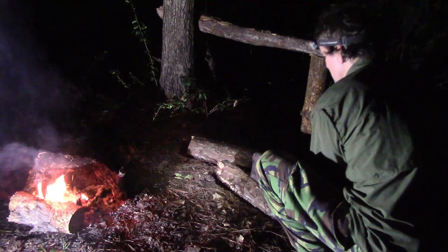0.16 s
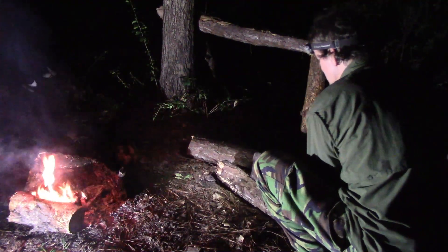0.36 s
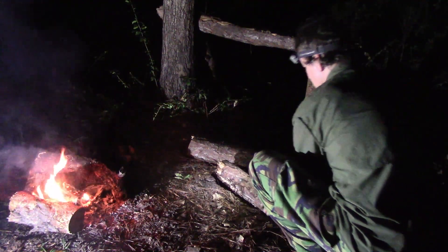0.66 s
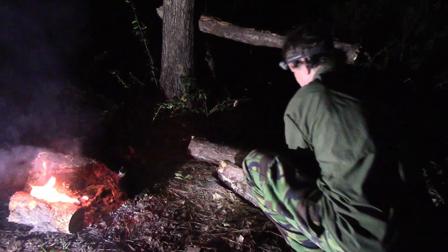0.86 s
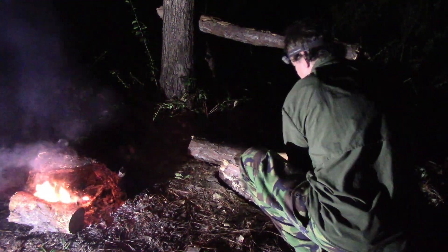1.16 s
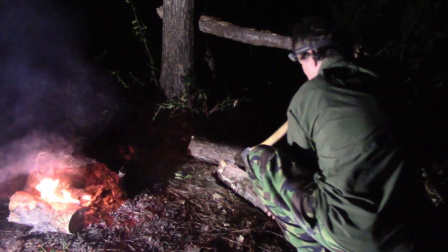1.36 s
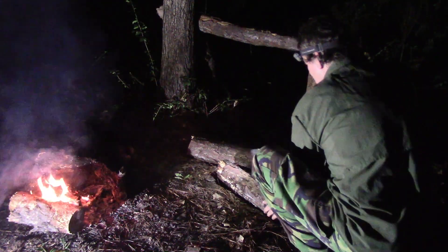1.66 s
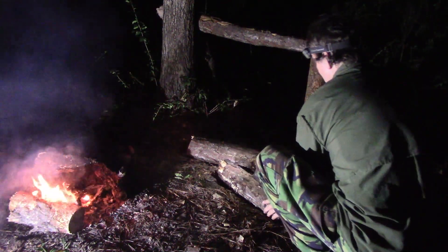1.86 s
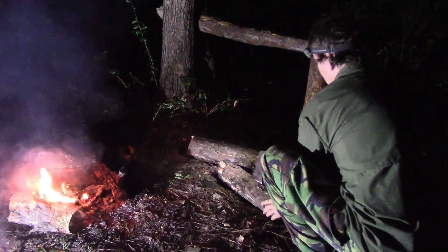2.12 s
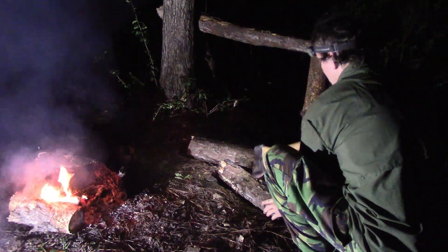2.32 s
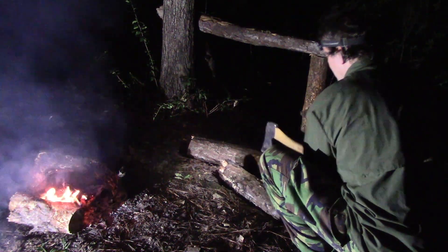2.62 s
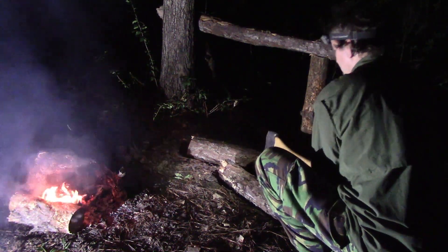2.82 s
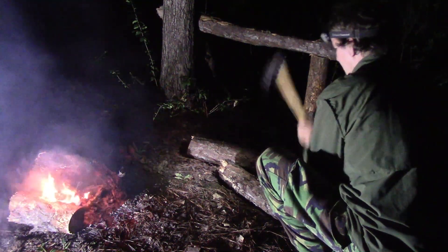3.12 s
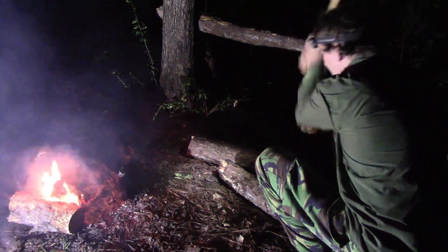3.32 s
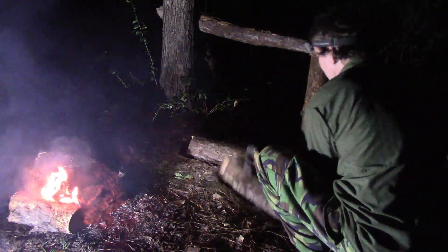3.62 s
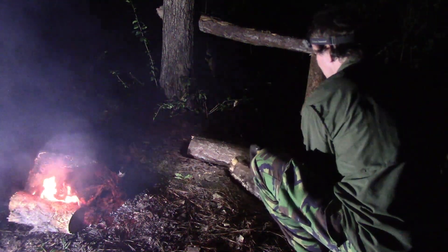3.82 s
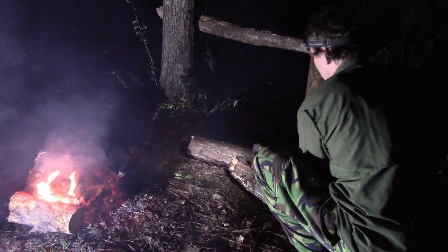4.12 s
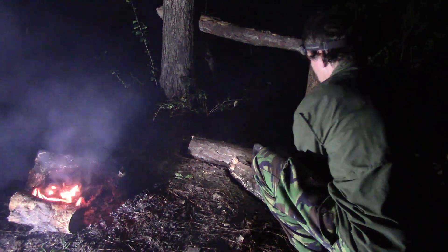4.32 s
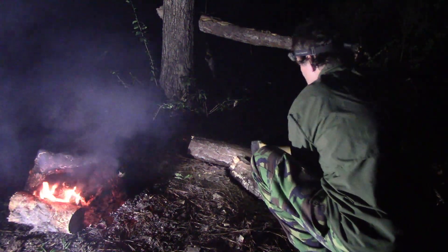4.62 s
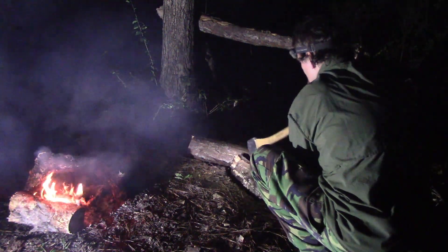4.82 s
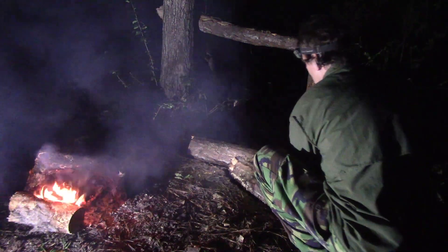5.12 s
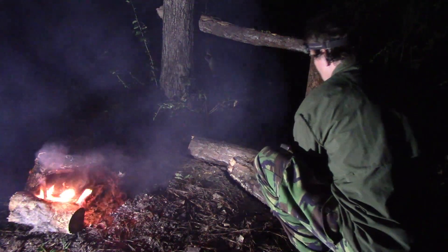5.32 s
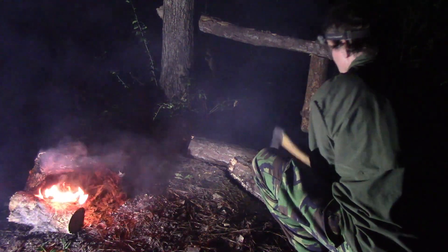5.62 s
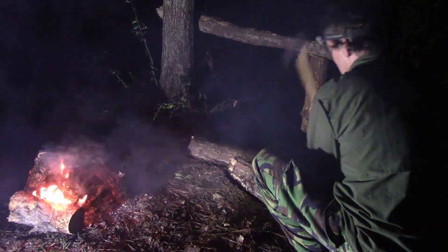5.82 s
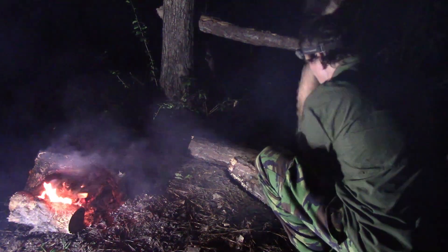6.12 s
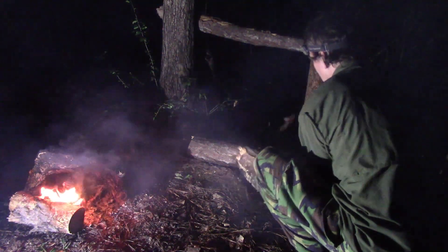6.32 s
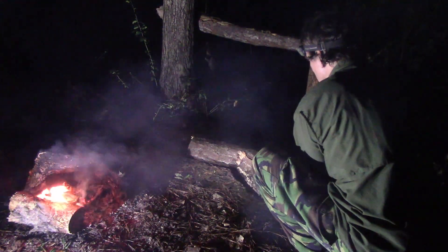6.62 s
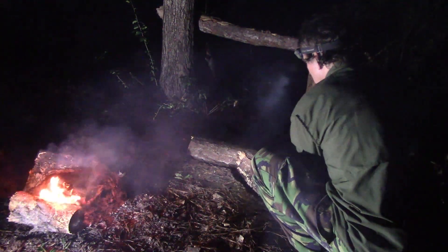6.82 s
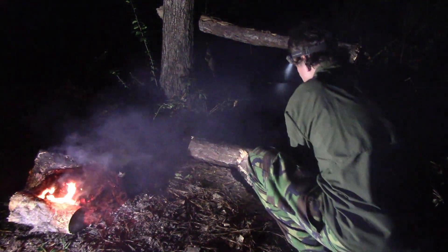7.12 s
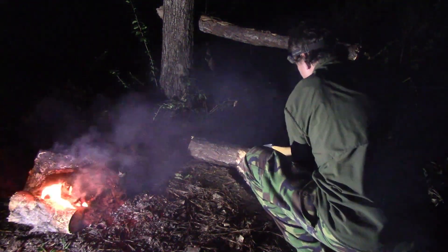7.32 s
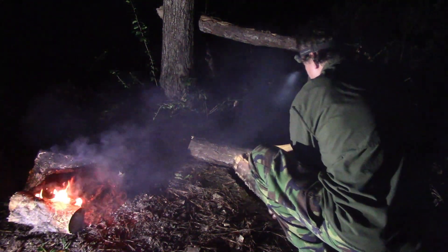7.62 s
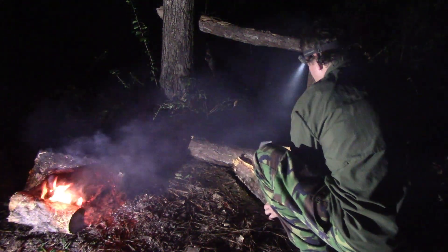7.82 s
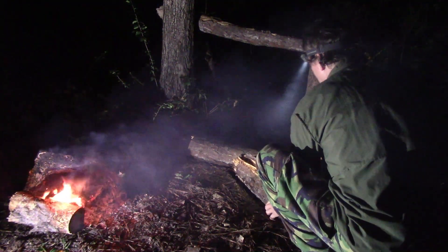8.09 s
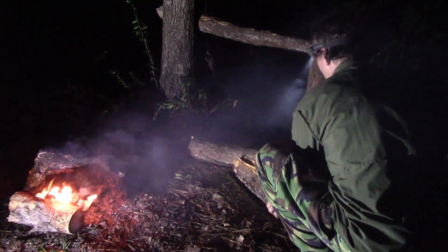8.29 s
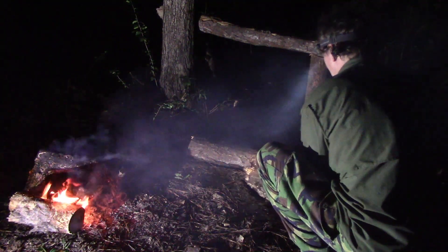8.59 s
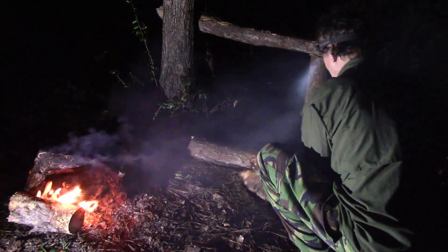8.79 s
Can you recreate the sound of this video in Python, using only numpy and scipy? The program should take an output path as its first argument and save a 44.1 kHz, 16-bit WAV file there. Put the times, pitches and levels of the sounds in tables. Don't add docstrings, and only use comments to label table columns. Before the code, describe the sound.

Quiet night woodland by a small fire, heard close. A faint tail of an earlier chop fades at 0 s under a steady, shimmering cricket trill, a very faint high cricket chirping in bursts, low flame flutter and airy hiss. Ember pops and knocks are busiest in the first two seconds, with a bright one at 0.44 s; soft leaf and cloth shuffles continue. At 3.6 s a hatchet cracks into a log, extremely loud, sharp and short, with a brief scatter from the trunks and a soil thud. Sparse pops follow, near 5 and 5.7 s. At 6.2 s a second blow lands, more hollow and woody. From 7.2 to 7.75 s fibres tear, snap and crunch densely, ending in tiny metallic tinks. A dull bump and rustle come at 8.25 s, then another cluster of snaps at 8.75 s, fading into insects and leaf rustle by 9 s.

```python
import sys
import numpy as np
from scipy import signal
from scipy.io import wavfile

SR = 44100
rng = np.random.default_rng(int(sys.argv[2]) if len(sys.argv) > 2 else 0)


def transcribe(signal):
    frames = np.atleast_2d(signal).T
    limited = np.clip(frames, -1, 1)
    pcm = np.round(limited * 32767).astype(np.int16)
    wavfile.write(sys.argv[1], SR, pcm)


def decibels_to_gain(level_db):
    exponent = np.asarray(level_db, float) / 20
    return 10 ** exponent


N = 394688
TIME = np.arange(N) / SR


def rms_one(x):
    return x / np.sqrt(np.mean(x ** 2) + 1e-20)


def peak_one(x):
    return x / np.max(np.abs(x))


def at_hz(points, hz):
    table = np.array(points)
    return np.interp(np.log(hz), np.log(table[:, 0]), table[:, 1])


def power_db(spectrum):
    return 10 * np.log10(np.sum(decibels_to_gain(2 * at_hz(spectrum, np.arange(20, 17000)))))


def add(out, s, sound):
    i = round(s * SR)
    out[max(i, 0):i + len(sound)] += sound[max(-i, 0):len(out) - i]


def drift(rate):
    r = np.exp(-80 * np.pi * rate / SR)
    steps = rng.standard_normal(N // 40 + 2002)
    slow = signal.lfilter([1], [1, -2 * r, r * r], steps)[2000:]
    return np.interp(np.arange(N) / 40, np.arange(len(slow)), rms_one(slow))


def band(x, low_hz, high_hz):
    edges = [low_hz, min(high_hz, .45 * SR)]
    return signal.sosfilt(signal.butter(2, edges, "band", fs=SR, output="sos"), x)


def steep_band(x, low_hz, high_hz):
    return band(band(x, low_hz, high_hz), low_hz, high_hz)


def ring(x, hz, t60):
    r, w = decibels_to_gain(-60 / (t60 * SR)), 2 * np.pi * hz / SR
    return signal.lfilter([0, np.sin(w)], [1, -2 * r * np.cos(w), r * r], x)


def burst(t60, rise=0., size=2048):
    age = np.arange(size) / SR - rise
    build_up = .5 * (1 + age / (rise + 1e-9))
    shape = np.where(age < 0, build_up, decibels_to_gain(-60 * age / t60))
    click = np.arange(size) == round(rise * SR)
    return rng.standard_normal(size) * shape + 2.47 * click


def parts(click, edges, dbs):
    return sum(decibels_to_gain(db) * peak_one(steep_band(click, *hz)) for hz, db in zip(edges, dbs))


# frequency in Hz, level in dB per Hz.
NIGHT_COLOUR = [(25, -6), (125, -6.5), (300, 1), (620, 2), (1050, -11), (3600, -22.5), (9500, -34.5),
                (16000, -49)]


def night_air(hz, flicker):
    level_db = -54 - power_db(NIGHT_COLOUR) + at_hz(NIGHT_COLOUR, hz)
    return decibels_to_gain(level_db + .6 * flicker + .9 * drift(10))


CHOIR_HZ = [2645, 2300, 3210, 2535, 2800]
# detuning spread in Hz, wing pulses per second, level in dB, number of singers.
CHOIRS = [(30.2, 50, -52.5, 7.3), (35.16, 41, -67, 5), (60, 59, -68, 5), (21.96, 64, -60.5, 4),
          (25.3, 72, -67.5, 3)]
# time in seconds, level in dB.
CHOIR_SWELL = [(0.0, -58.5), (0.3, -56.5), (0.65, -55), (1.39, -54), (1.49, -55.5), (1.94, -54.5),
               (2.17, -57), (2.99, -55.5), (3.21, -53.5), (3.61, -53.5), (4.16, -55), (5.33, -55.5),
               (6.5, -55), (6.98, -55.5), (7.5, -54.5), (7.7, -54.5), (8.55, -56), (8.95, -53.5)]


def choirs():
    out = np.zeros((2, N))
    swell_s, swell_db = np.transpose(CHOIR_SWELL)
    swell = decibels_to_gain(np.interp(TIME, swell_s, swell_db - np.median(swell_db)))
    coarse = TIME[::8]
    for hz, (spread_hz, per_s, db, singers) in zip(CHOIR_HZ, CHOIRS):
        detune, pace, phase, loud, place = rng.standard_normal((int(singers), 5)).T[:, :, None]
        detune = rms_one(detune - detune.mean())
        stroke = per_s * (1 + .05 * pace) * coarse + phase * 9 + .5 * drift(3.14)[::8] * place
        pulses = np.maximum(np.sin(2 * np.pi * stroke) + 0.5, 0) * decibels_to_gain(2 * loud)
        wobble = np.cumsum(drift(15)[::8]) * (coarse[1] * spread_hz) * 0.35 * np.tanh(2 * pace)
        tones = pulses * np.exp(2j * np.pi * (spread_hz * detune * coarse + wobble + place))
        carrier = np.exp(2j * np.pi * hz * TIME)

        def sing(envelope):
            full = np.interp(TIME, coarse, envelope.real) + 1j * np.interp(TIME, coarse, envelope.imag)
            return np.real(full * carrier)
        mid = sing(tones.sum(0))
        side = sing((tones * (place - place.mean())).sum(0) * 0.12)
        out += decibels_to_gain(db) * swell * (mid + side * [[1], [-1]]) / np.std(mid)
    blur = steep_band(rng.standard_normal((2, N)), 5160, 6050)
    return out + decibels_to_gain(-68) * swell * rms_one(blur[0] + 0.24 * blur[1] * [[1], [-1]])


# start in seconds, length in seconds, level in dB.
CHIRPS = [(0.065, 0.11, -82), (0.215, 0.3, -88), (0.694, 0.21, -86), (1.066, 0.13, -83.5),
          (1.215, 0.14, -88), (1.628, 0.15, -85), (2.087, 0.27, -89), (2.505, 0.18, -85),
          (2.996, 0.14, -87), (3.495, 0.084, -87), (4.073, 0.16, -86), (4.568, .22, -86.5),
          (5.268, 0.13, -86), (5.945, 0.1, -86), (6.394, 0.16, -86), (6.673, .1, -91), (6.895, 0.27, -88),
          (7.963, 0.17, -91), (8.137, .033, -90)]


def lone_cricket():
    out = np.zeros((2, N))
    wing_hz, pulses_per_s = 6085, 31.5
    for s, length, db in CHIRPS:
        age = np.arange(round(length * SR)) / SR
        pulses = np.sin(np.pi * pulses_per_s * age) ** 2 + 0.038
        pulses = pulses * np.maximum(np.sin(np.pi * age / length), 0) ** 0.15
        strokes = decibels_to_gain(rng.normal(0, 2.5, 16))[(pulses_per_s * age).astype(int)]
        tone = np.sin(2 * np.pi * (wing_hz + rng.normal(0, 14)) * age)
        chirp = decibels_to_gain(db + 8.5) * pulses * strokes * tone
        add(out[0], s, chirp * decibels_to_gain(15.0))
        add(out[1], s, chirp * decibels_to_gain(14.5))
    return out


# start in seconds, then knock, click, fizz and spit levels in dB.
POPS = [(0.057, -36, -39, -38, -61), (0.1581, -70, -59, -51, -66), (0.3157, -75, -54, -59, -69),
        (0.4401, -39, -27, -33, -32.5), (0.444, -69, -43, -55, -70), (0.4523, -71, -50, -48, -49),
        (0.644, -59, -56, -42, -66), (0.653, -67, -42, -42.5, -62), (0.8031, -52, -54, -52, -65),
        (0.836, -41, -42, -44.5, -54), (0.9001, -59, -47, -48, -66), (1.115, -46, -37, -41, -59),
        (1.1227, -41, -45, -54, -77), (1.38, -53, -44, -45, -58), (1.8581, -70, -53, -51, -55),
        (1.938, -74, -56, -45, -57),
        (1.9926, -62, -56, -47, -62), (2.3062, -67, -45, -44, -64), (3.8908, -58, -39, -46, -75),
             (3.9328, -70, -55, -48, -67), (4.0085, -67, -52, -53, -68), (4.0996, -73, -58, -53, -76),
             (4.1901, -73, -46, -47, -67), (4.7948, -59, -53, -55, -58), (4.985, -36, -39, -48, -64),
             (4.9986, -55, -45, -54, -68), (5.06, -44, -39, -45, -61), (5.686, -59, -42, -35.5, -42),
             (5.691, -72, -50, -46, -55), (6.5636, -73, -45, -43, -62), (6.6617, -72, -48, -45, -63),
             (7.871, -54, -33, -39, -48), (8.1377, -71, -57, -52, -53)]
# low edge in Hz, high edge in Hz.
POP_PARTS = [(1500, 2600), (2600, 6000), (6000, 10000), (10000, 16000)]
# start in
# seconds, peak in dB, pitch in Hz.
TICKS = [(.1261, -52, 11000), (.1611, -52, 13000), (1.0871, -48, 9500), (1.1651, -50, 6500),
         (1.1891, -49, 9000), (1.1906, -41, 3600), (1.3021, -49, 9000), (1.9761, -51, 6000),
         (2.4871, -52, 6500), (3.6115, -24, 8000), (4.0761, -50, 9000), (6.2296, -25, 7000),
         (6.3661, -47, 9000), (7.6491, -48, 9500), (7.7191, -48, 10500), (7.8561, -52, 10000),
         (8.2231, -49, 9000), (8.3001, -48, 8500), (8.4701, -46, 6500), (8.4851, -50, 12000),
         (8.8471, -45, 10000), (8.8781, -48, 13500), (8.8841, -48, 9000), (8.9271, -47, 8000)]
# start in seconds, peak in dB, pitch in Hz.
KNOCKS = [(.0571, -38, 690), (.0591, -40, 1300), (.0731, -44, 1500), (.8031, -45, 790), (.8351, -52, 530),
          (1.1641, -53, 883), (1.1902, -41, 1900), (1.1904, -36.5, 1040), (1.1911, -36.5, 2800),
          (1.3007, -38.5, 700), (1.3011, -39.5, 1050), (1.3801, -42, 3100), (1.9081, -43, 1260),
          (2.3043, -46, 2300), (3.8001, -43.5, 470), (3.8151, -38, 1300), (3.9291, -45, 940),
          (3.9661, -50, 8000), (4.7251, -51, 9600), (4.9841, -35, 2900), (4.9852, -38.5, 680),
          (5.2571, -53, 13000), (5.5101, -55, 12000), (6.3641, -32, 1700), (8.1368, -48, 3400),
          (8.2216, -40, 2200)]


def fire():
    out = np.zeros(N)
    for s, *dbs in POPS:
        add(out, s, parts(burst(0.0055, size=1024), POP_PARTS, dbs))
    for s, db, hz in TICKS:
        add(out, s, decibels_to_gain(db) * peak_one(band(burst(0.004, size=512), hz / 1.3, hz * 1.3)))
    for s, db, hz in KNOCKS:
        add(out, s, decibels_to_gain(db) * peak_one(band(burst(0.014), hz / 1.14, hz * 1.14)))
    sizes = decibels_to_gain(-54 + 2.5 * np.minimum(rng.exponential(1, N), 3))
    crackle = (rng.random(N) < 22 / SR) * sizes
    dealt = rng.integers(0, 3, N)
    for k, hz in enumerate((6500, 8500, 11000)):
        out += band(crackle * (dealt == k), hz / 0.97, hz * 1.1)
    return out


# peak time in seconds, size in seconds, crunch in dB, dry leaves over crunch in dB.
MOVES = [(0.01, 1, -57, -15), (.67, 0.26, -58, -6), (.86, 0.2, -68.5, 2), (1.3, 0.95, -61.5, -14),
         (1.83, .3, -72, -8), (2.64, 0.45, -58, -7.5), (3.79, 0.22, -47.5, -8), (4.0, 0.64, -58.5, -17),
         (4.44, 0.097, -63.5, 0), (5.02, 0.33, -62.5, -4), (5.27, 0.18, -73, 6), (5.45, 0.21, -59, -6),
         (6.38, 1, -56.5, -20), (7.29, 0.23, -42.5, -8.5), (7.33, 0.092, -45, -5), (7.4, 0.18, -50.5, -7),
         (7.59, 0.41, -52.5, -8.5), (8.241, 0.026, -47, -10), (8.256, 0.039, -47.5, -4),
         (8.309, 0.14, -51, -2.5), (8.37, 0.44, -57, -2), (8.52, 0.18, -62, -2), (8.771, 0.072, -41, -6),
         (8.83, 0.15, -49, -5.5), (8.95, 0.12, -54, -2)]


def shuffle():
    rest_rustle_db, rest_crunch_db, rest_cloth_db = -72.5, -63.5, -81.5
    coarse = TIME[::64]
    s, size, db, dry_db = np.transpose(MOVES)[:, :, None]
    away = np.maximum((s - coarse) / (0.39 * size), (coarse - s) / (0.69 * size))
    power = decibels_to_gain(2 * db - 40 * away)
    rustle = np.sqrt(decibels_to_gain(2 * rest_rustle_db) + (power * decibels_to_gain(2 * dry_db)).sum(0))
    crunch = np.sqrt(decibels_to_gain(2 * rest_crunch_db) + power.sum(0))
    cloth = decibels_to_gain(rest_cloth_db) * (rustle / decibels_to_gain(rest_rustle_db)) ** 0.65
    return [np.interp(TIME, coarse, gain) for gain in (rustle, crunch, cloth)]


# frequency in Hz, level in dB per Hz.
RUSTLE_COLOUR = [(2500, -18.5), (4000, 1), (6000, 6), (9000, -19), (12000, -3), (16000, -19)]
# frequency in Hz, level in dB per Hz.
CRUNCH_COLOUR = [(250, -17), (600, -14.5), (1000, -2), (2000, -13.5), (3500, -8.5), (6000, -58)]
# frequency in Hz, level in dB per Hz.
CLOTH_COLOUR = [(6000, -22), (10000, -6), (12500, -7), (15000, -11), (17000, -13)]


def litter():
    rustle, crunch, cloth = shuffle()
    grain = rms_one(decibels_to_gain(np.clip(3.9 * drift(38.8) + 2.8 * drift(1.6), -9, 5)))
    return [(rustle * decibels_to_gain(-0.5 - power_db(RUSTLE_COLOUR)) * grain, RUSTLE_COLOUR),
            (crunch * decibels_to_gain(2.5 - power_db(CRUNCH_COLOUR)) * grain, CRUNCH_COLOUR),
            (cloth * decibels_to_gain(1.5 - power_db(CLOTH_COLOUR)), CLOTH_COLOUR)]


def grit(per_s, low_hz, high_hz):
    sizes = decibels_to_gain(3 * np.minimum(rng.exponential(1, N), 3)) * rng.choice([-1, 1], N)
    clicks = (rng.random(N) < per_s / SR) * sizes
    return rms_one(steep_band(clicks, low_hz, high_hz))


def litter_grit():
    rustle, crunch, _ = shuffle()
    return crunch * decibels_to_gain(-4.0) * grit(1200, 1090, 4070) + rustle * decibels_to_gain(-0.5) * grit(1800, 5000, 9930)


# start in seconds, peak in dB, pitch in Hz.
THUDS = [(.0701, -54, 60), (3.6323, -28, 240), (3.6441, -30, 90), (3.7338, -48, 127), (3.8401, -52, 90),
         (4.3335, -44, 250), (4.4811, -50, 80), (6.2323, -24, 135), (6.2625, -30, 90), (7.2762, -38.5, 253),
         (7.5224, -49, 231), (8.2596, -31, 226), (8.2676, -43, 100), (8.3211, -39.5, 94),
         (8.3597, -37.5, 204), (8.3751, -44, 90), (8.8031, -34.5, 400), (8.9326, -39, 370),
         (8.934, -42, 205)]


def thuds():
    out = np.zeros(N)
    for s, db, hz in THUDS:
        push = band(burst(0.031, size=4096), hz / 2.06, hz * 2.27)
        add(out, s, decibels_to_gain(db) * peak_one(ring(push, hz, 10.0 / hz)))
    return out


# start in
# seconds, then wood, tear, crack and splinter levels in dB.
SNAPS = [(7.189, -36.5, -42, -41, -38), (7.204, -50, -40, -38, -38), (7.2345, -63, -54, -49, -39),
         (7.2384, -32, -35, -33, -42), (7.243, -50, -35, -38, -41), (7.2525, -55, -51, -36, -38),
         (7.2577, -36, -34, -26, -37), (7.265, -32, -34, -54, -37), (7.273, -53, -49, -61, -35),
         (7.2809, -31, -23.5, -34, -30), (7.2842, -19.5, -39, -15, -20), (7.2866, -13, -31, -30, -32),
         (7.2925, -20, -23, -29, -26), (7.305, -46, -52, -50, -38), (7.3157, -44, -53, -52, -38),
         (7.3222, -34, -30, -30, -23.5), (7.324, -21, -16, -16.5, -25), (7.3271, -32, -23, -35, -25),
         (7.3293, -36, -29, -30, -28), (7.338, -29, -30, -35, -34), (7.344, -31, -35, -40, -45),
         (7.359, -53, -52, -55, -59), (7.3697, -30, -40, -41, -36), (7.3759, -15.5, -15, -35, -37),
         (7.382, -28, -29, -34, -30), (7.3856, -29, -41, -40, -36), (7.4, -47, -46, -53, -36),
         (7.4051, -45, -53, -54, -40), (7.411, -33, -54, -61, -62), (7.44, -62, -54, -38, -40),
         (7.464, -37, -45, -40.5, -22.5), (7.503, -62, -43, -43, -38), (7.5196, -32.5, -37, -40, -39),
         (7.5554, -59, -45, -41, -36), (7.574, -41, -30, -37, -31), (7.58, -22, -42, -31, -32),
         (7.5897, -36, -62, -63, -41), (7.6274, -48, -52, -44, -35.5), (7.6372, -41, -39, -47, -44),
         (7.67, -49, -38, -45, -42), (7.671, -31.5, -39, -43, -42),
         (7.69, -61, -57, -67, -49), (7.714, -42, -56, -61, -48), (7.7483, -39, -45, -49, -46),
              (8.2394, -53, -56, -37, -80), (8.307, -40, -56, -55, -45), (8.362, -47, -42, -41, -43),
              (8.741, -50, -58, -47, -49), (8.753, -55, -55, -64, -65), (8.762, -31, -26, -36, -37),
              (8.769, -41, -34, -38, -34), (8.7702, -21.5, -28, -27, -23.5), (8.7742, -29, -32, -39, -36),
              (8.778, -34, -33, -38, -38), (8.783, -40, -35, -38, -32), (8.804, -25, -38, -54, -59),
              (8.8083, -30, -21.5, -28.5, -32), (8.814, -34, -31, -57, -44), (8.818, -34, -37, -58, -49),
              (8.824, -55, -52, -43, -48), (8.835, -59, -54, -45, -48), (8.849, -39, -33.5, -41, -52),
              (8.868, -43, -49, -45, -40), (8.934, -45, -38, -57, -41)]
# low edge in Hz, high edge in Hz.
SNAP_PARTS = [(1600, 2900), (2900, 4600), (4800, 9800), (9800, 16000)]
# frequency in Hz, t60 in seconds, level in dB.
SNAP_MODES = [(730, 0.032, -11), (1047, 0.012, 21), (1355, 0.017, 16.5)]


def splitting():
    out = np.zeros(N)
    for s, wood_db, *dbs in SNAPS:
        tear = burst(0.0065, rise=0.0003, size=1024)
        wood = np.zeros(1024)
        for hz, t60, mode_db in SNAP_MODES:
            wood += decibels_to_gain(mode_db + rng.normal(0, 2.5)) * ring(tear, hz, t60)
        add(out, s, decibels_to_gain(wood_db) * peak_one(band(wood, 450, 1570)))
        top_db = dbs[-1] - 25.5
        add(out, s, parts(tear, SNAP_PARTS, dbs + [top_db]))
    return out


# start in seconds, pitch in Hz, level in dB.
TINKS = [
    (7.7121, 8300, -49),
    (7.7461, 11500, -62),
    (7.7481, 8300, -46),
]


def blade_tinks():
    out = np.zeros(N)
    click = np.arange(8192) == 0
    for s, hz, db in TINKS:
        add(out, s, decibels_to_gain(db) * ring(click, hz, 0.03))
    return out


# start in seconds, blow in dB, splintering t60 in seconds, scattered sound in dB.
BLOWS = [
    (-.06, -60, .012, -38),
    (3.605, -1.5, 0.0044, -28.5),
    (6.225, -2, 0.0037, -30),
]
# frequency in Hz, level in dB per Hz.
BITE_SCATTER = [(50, -7), (280, -9), (600, -8), (1050, 0.5), (1500, -8), (2500, -6.5), (6500, -6),
                (16000, -35)]
# frequency in Hz, level in dB per Hz.
SPLIT_SCATTER = [(50, -5), (430, -17), (680, -1), (900, -3.5), (1510, -12.5), (4220, -5.5), (9570, -16.5),
                 (16000, -39)]
# frequency in Hz, t60 in seconds.
SCATTER_T60 = [(60, 1), (250, 0.71), (900, 0.83), (3000, 0.59), (12000, 0.41)]


def add_scatter(power, hz):
    age = TIME[:SR]
    onset = np.interp(age, [0, .004, .02, .03], [0.005, 1.0, 0.23, 1.0])
    fade = onset * decibels_to_gain(-60 * age / at_hz(SCATTER_T60, hz))
    for (s, _, _, scatter_db), colour in zip(BLOWS, (BITE_SCATTER, BITE_SCATTER, SPLIT_SCATTER)):
        level = decibels_to_gain(scatter_db + at_hz(colour, hz) - power_db(colour))
        add(power, s, (fade * level) ** 2)


# frequency in Hz, side minus mid in dB.
SPREAD = [(60, -10.5), (180, -8.5), (550, -15), (1650, -5.5), (4970, -6), (15000, -15)]


def woods():
    out = 0
    edges = 25 * 2 ** np.arange(0, 9.6, .5)
    white = rng.standard_normal((2, 2, N))
    moving = litter()
    flicker = drift(0.94)
    for k, (low, high) in enumerate(zip(edges, edges[1:])):
        hz = np.sqrt(low * high)
        near_power = sum((gain * decibels_to_gain(at_hz(colour, hz))) ** 2 for gain, colour in moving)
        add_scatter(near_power, hz)
        near, far = np.sqrt(near_power), night_air(hz, flicker)
        mid, side = band(white[k % 2], low, high) * np.sqrt(SR / 2)
        width = np.sqrt((far * decibels_to_gain(at_hz(SPREAD, hz))) ** 2 + (near * decibels_to_gain(-19.0)) ** 2)
        out = out + np.sqrt(near ** 2 + far ** 2) * mid + width * side * [[1], [-1]]
    return out


# frequency in Hz, t60 in seconds, level in dB.
BITE_MODES = [(134, 0.055, -19), (233, 0.033, -14.5), (295, .02, -16.5), (413, 0.027, -15),
              (496, 0.026, -18.5), (660, 0.036, -15), (862, 0.028, -15), (1055, 0.034, -15),
              (1190, 0.026, -13.5), (1470, .016, -12.5), (1615, 0.0097, -14.5), (1850, 0.018, -21),
              (2340, 0.014, -12), (2600, 0.0096, -6)]
# frequency in Hz, t60 in seconds, level in dB.
SPLIT_MODES = [(135, 0.07, -17.5), (248, 0.046, -14.5), (405, 0.035, -23.5), (520, 0.064, -24),
               (678, 0.036, -4), (785, 0.018, -8), (926, 0.026, -8), (1575, 0.032, -16),
               (1950, 0.019, -20.5), (2590, 0.019, -8)]
# band in Hz, t60 in seconds, first blow in dB, second blow in dB.
CRACK = [(507, 0.044, -32, -19), (1225, 0.034, -12, -4.5), (1550, 0.022, -5, -14), (2070, 0.038, -13, -5.5),
         (2290, 0.018, -4, 0), (3360, 0.02, 1.5, -2.5), (4570, 0.011, -21, -42), (6100, 0.014, -1, -11),
         (8600, 0.024, -8.5, -12.5), (11800, 0.0098, -30, -16), (14200, 0.016, -21, -24)]
# delay in seconds, first blow in dB, second blow in dB.
ECHOES = [(.027, -21, -22), (.031, -32, -28), (.035, -21, -26), (.039, -26, -30), (.044, -29, -43),
          (.05, -32, -26), (.072, -30, -37)]


def hatchet():
    out = np.zeros(N)
    age = np.arange(8192) / SR
    for k, modes in enumerate((BITE_MODES, SPLIT_MODES)):
        s, blow_db, t60, _ = BLOWS[k + 1]
        drive = burst(t60, size=8192)
        body = np.zeros(8192)
        for m, (hz, ring_s, db) in enumerate(modes):
            tone = peak_one(ring(ring(drive, hz, 5.6 / hz), hz, ring_s))
            ground_lag = 0.53 / hz
            add(body, ground_lag, (-1) ** m * decibels_to_gain(db) * tone)
        for hz, crack_s, *db in CRACK:
            noise = rms_one(band(rng.standard_normal(8192), hz / 1.24, hz * 1.18))
            shape = (1 - np.exp(-age / 0.0007)) * decibels_to_gain(-60 * age / crack_s)
            body += decibels_to_gain(db[k] - 4.5) * noise * shape
        body = band(body, 90, 16000)
        add(out, s, decibels_to_gain(blow_db) * body)
        for delay, *db in ECHOES:
            rough_bark = peak_one(burst(0.0018, size=64))
            echo = band(np.convolve(body[:1024], rough_bark), 220, 3200)
            add(out, s + delay, decibels_to_gain(blow_db + db[k]) * echo)
    return out


def scene():
    close = fire() + litter_grit() + thuds() + splitting() + blade_tinks() + hatchet()
    smear = rms_one(burst(0.035, size=512)) / np.sqrt(512)
    side = decibels_to_gain(-27.0) * band(np.convolve(close, smear, "full")[:N], 900, 12000)
    mix = choirs() + lone_cricket() + woods() + close + side * [[1], [-1]]
    return mix * decibels_to_gain(-0.01 * np.array([[1], [-1]]))


def roll_off(x):
    return signal.sosfilt(signal.butter(12, 17020, fs=SR, output="sos"), x)


def record(dry):
    thin = signal.sosfilt(signal.butter(2, 90, "high", fs=SR, output="sos"), dry)
    clipped = np.clip(thin, -.96, .96)
    mix = signal.sosfilt(signal.cheby2(12, 80, 16900, fs=SR, output="sos"), clipped)
    return roll_off(mix)


dry = scene()
out = record(dry)
transcribe(out)
```